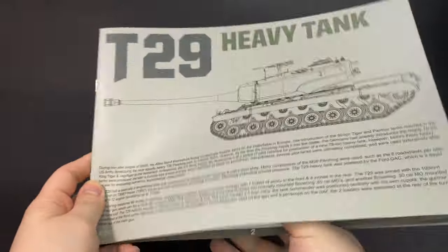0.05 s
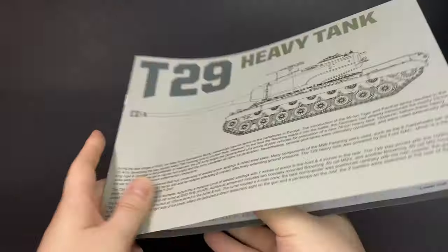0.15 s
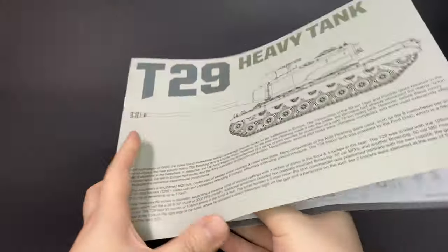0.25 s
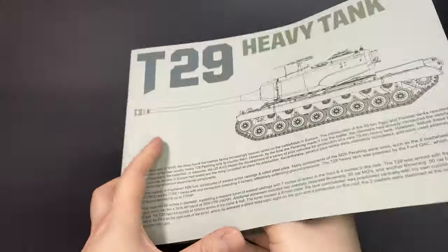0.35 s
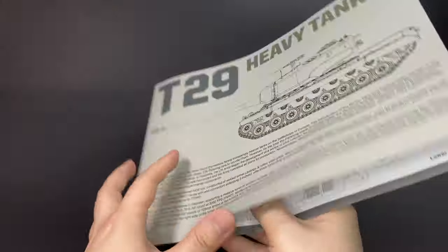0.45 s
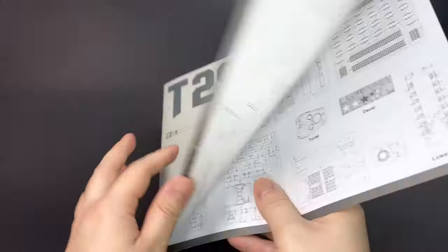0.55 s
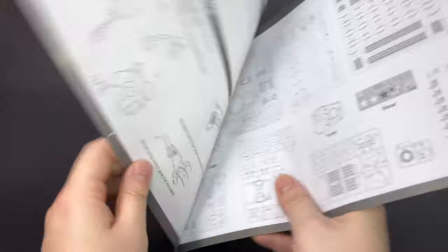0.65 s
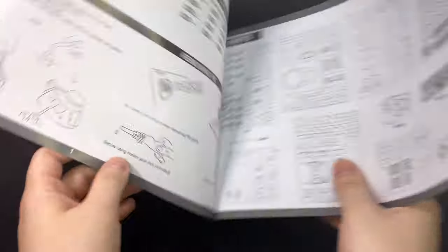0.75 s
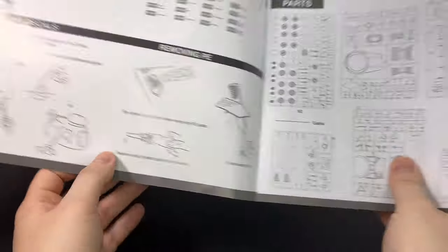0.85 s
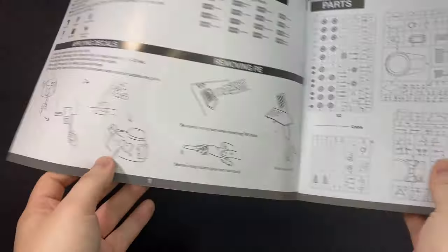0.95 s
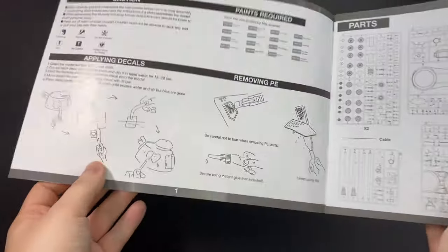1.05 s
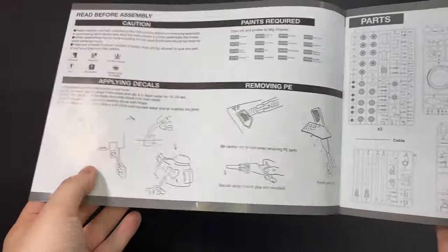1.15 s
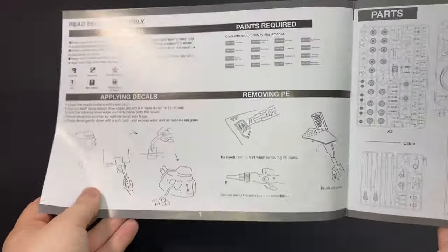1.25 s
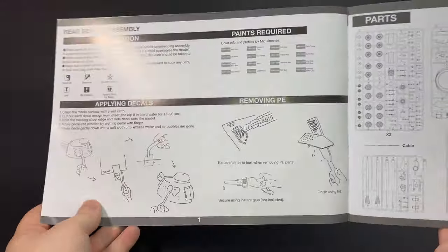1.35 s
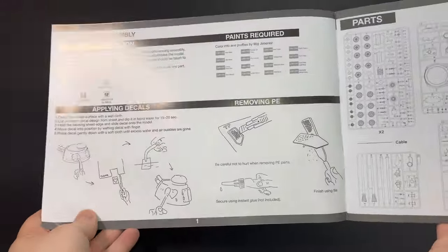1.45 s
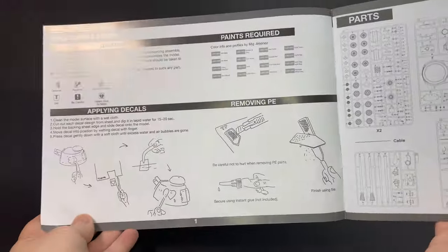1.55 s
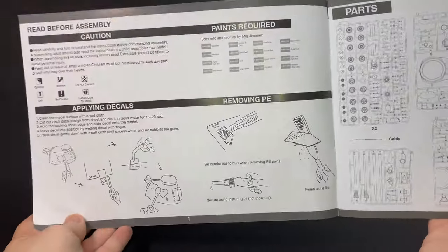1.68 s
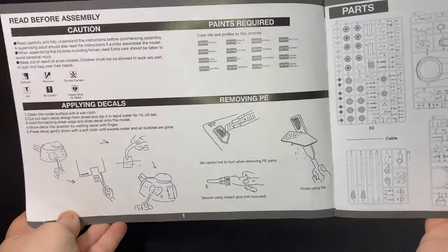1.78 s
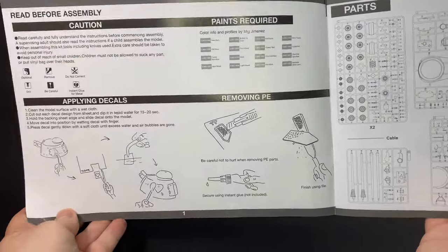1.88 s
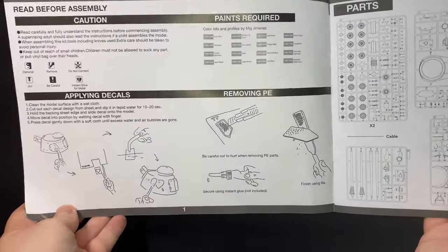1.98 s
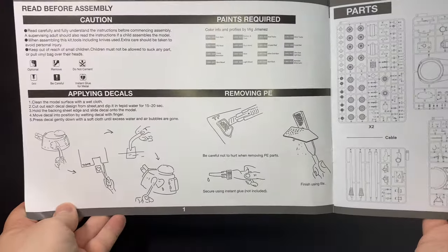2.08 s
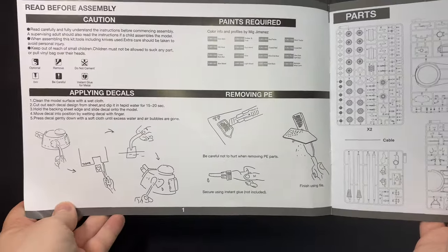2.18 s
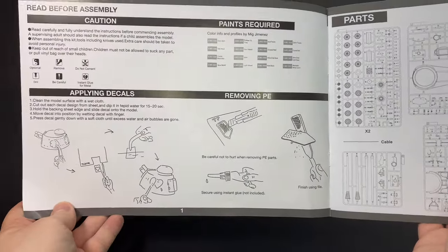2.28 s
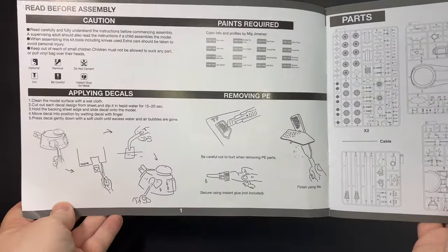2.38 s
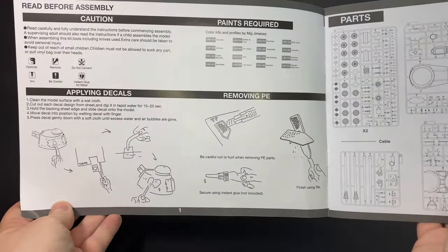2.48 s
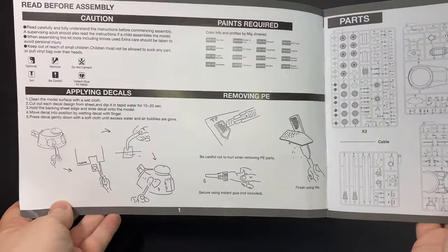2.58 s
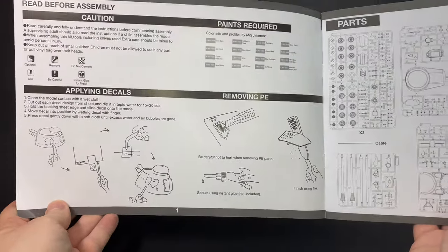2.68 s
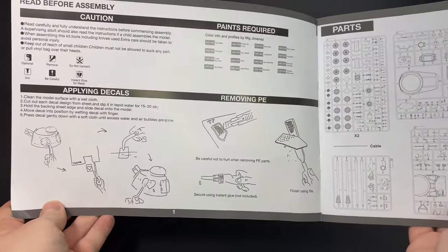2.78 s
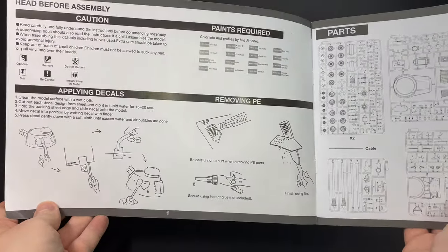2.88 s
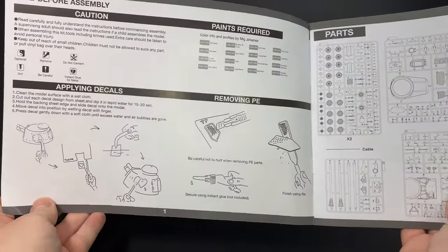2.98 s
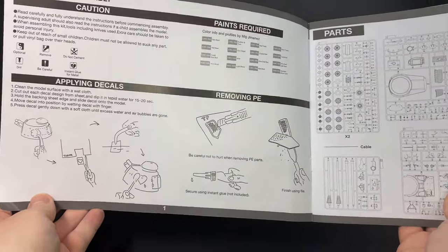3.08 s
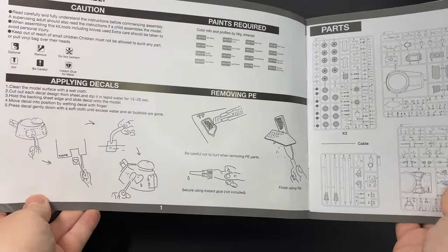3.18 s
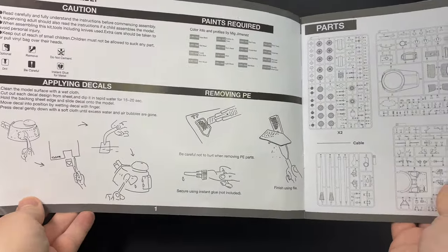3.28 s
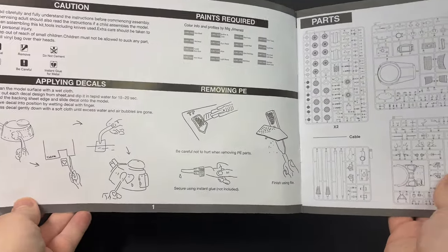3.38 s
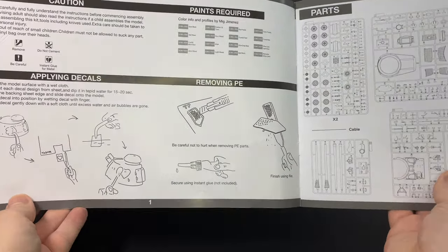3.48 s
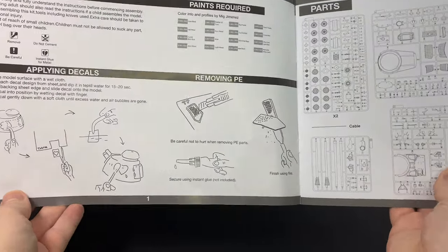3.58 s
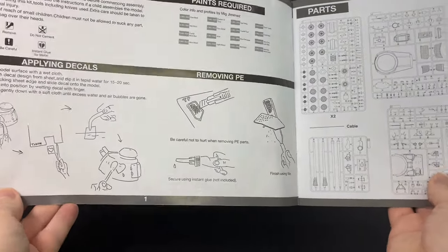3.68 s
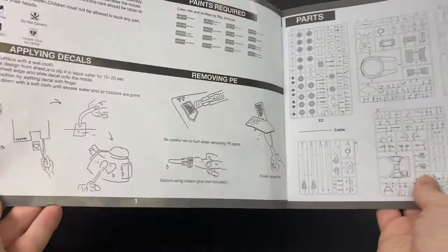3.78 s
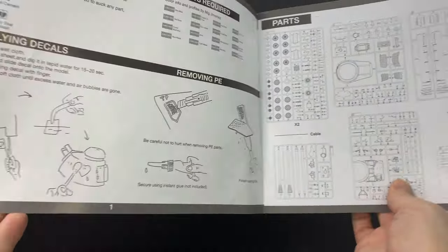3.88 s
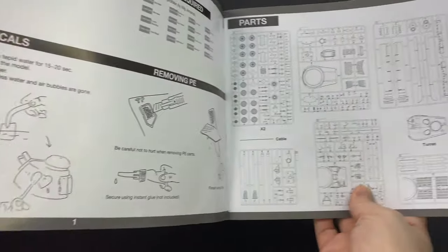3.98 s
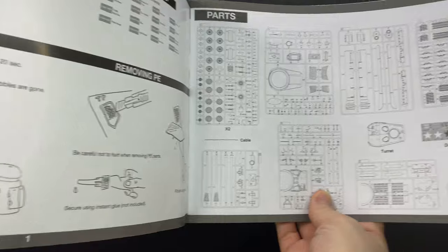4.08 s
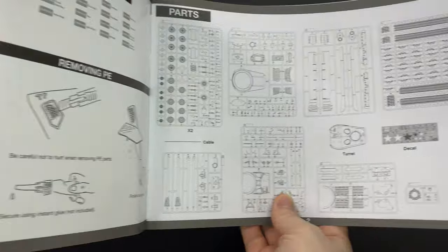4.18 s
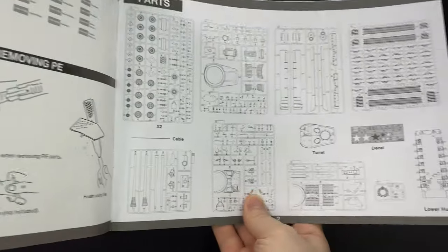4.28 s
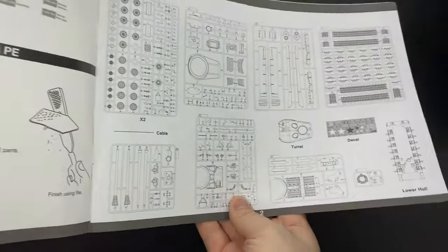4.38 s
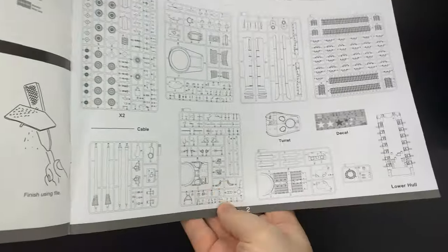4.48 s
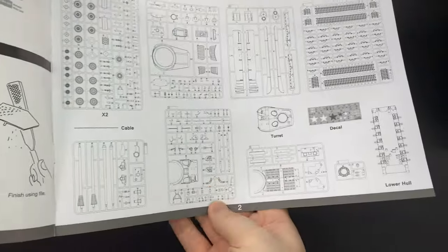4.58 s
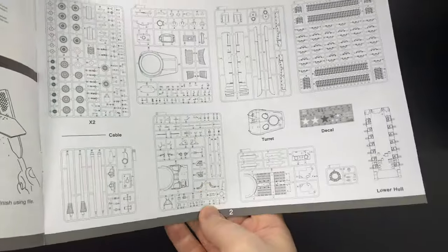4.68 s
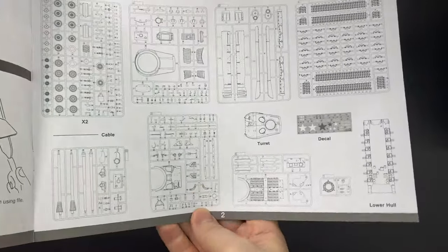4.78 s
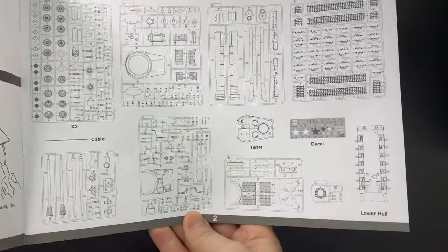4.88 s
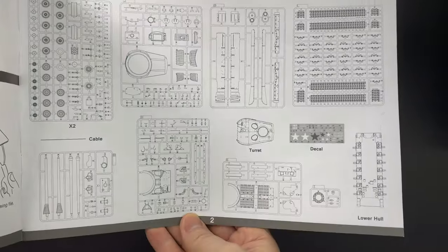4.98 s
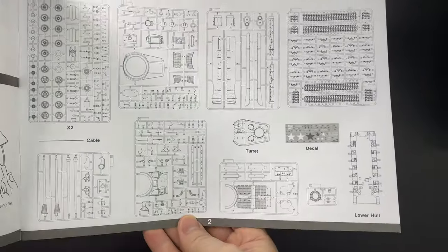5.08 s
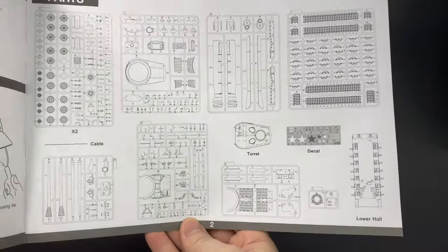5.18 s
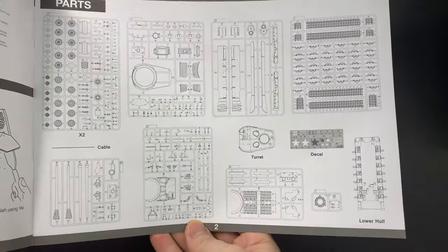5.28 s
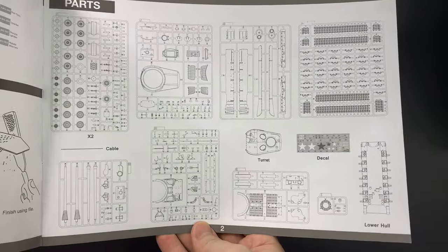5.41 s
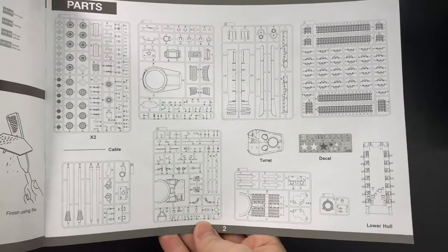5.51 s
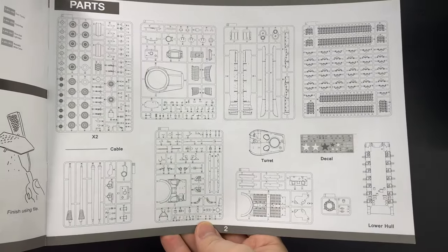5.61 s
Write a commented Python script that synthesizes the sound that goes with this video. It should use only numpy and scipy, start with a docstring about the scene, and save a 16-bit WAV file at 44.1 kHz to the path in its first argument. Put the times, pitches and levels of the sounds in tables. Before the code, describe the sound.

Busy rustle, flap and crackle of thick pages for two seconds, then near quiet and two softer rustles above a faint indoor hum.

```python
"""A stiff paper booklet is opened and handled close to the microphone in a small, quiet room.
Low hum, rumble and a faint drone last throughout. From the start, sheets slide (dense hissing slips) and are
rubbed (short slip runs); then pages wobble (dispersed bucklings) and flap (ringing bands of modes), and page
edges flick off the thumb (falling bending-wave chirps), most thickly from 1.2 to 1.9 s.
After a lull, fainter handling returns near 2.8 s, as the drone stands out and then mostly climbs in pitch."""
import sys
import numpy as np
from scipy import signal
from scipy.fft import rfft, irfft, next_fast_len
from scipy.io import wavfile

SR = 44100
rng = np.random.default_rng(int(sys.argv[2]) if len(sys.argv) > 2 else 0)


def persist_wave(psi):
    """Save psi, clipped to +-1, as 16-bit WAV."""
    counts = np.round(np.clip(psi, -1, 1) * 32767).astype(np.int16)
    wavfile.write(sys.argv[1], SR, np.atleast_2d(counts).T)


N = 249165
TIME = np.arange(N) / SR
SHORT = 8192  # length of a brief sound [samples]
SHORT_TIME = np.arange(SHORT) / SR
SHORT_HZ = np.maximum(np.fft.rfftfreq(SHORT, 1 / SR), 1)


def undb(db):
    """Amplitude ratio of a level in decibels: twenty decibels make a factor of ten."""
    return 10 ** (np.asarray(db) / 20)


def unit(x):
    """Normalise the root-mean-square amplitude to 1."""
    return x / np.sqrt(np.mean(x ** 2))


def gains(points, hz):
    """Read a spectrum as straight lines of level against log frequency, flat beyond its ends."""
    f, db = np.transpose(points)
    return undb(np.interp(np.log(np.maximum(hz, 1e-6)), np.log(f), db))


def hump(hz, centre_hz, octaves):
    """A Gaussian band on the log-frequency axis, whose standard deviation is given in octaves."""
    distance = np.log2(np.maximum(hz, 1) / centre_hz)
    return np.exp(-.5 * (distance / octaves) ** 2)


def shape(x, response):
    """Linear filtering: multiply the spectrum by a function of frequency."""
    size = next_fast_len(x.shape[-1] + 2048)
    spectrum = rfft(x, size) * response(np.fft.rfftfreq(size, 1 / SR))
    return irfft(spectrum, size)[..., :x.shape[-1]]


def stereo_field(pair, apart_hz):
    """Interchannel coherence: left and right are alike in the bass, unrelated above apart_hz."""
    side = shape(pair[1], lambda f: np.clip(f / apart_hz, .17, 1))
    return np.array([pair[0] + side, pair[0] - side])


def walk(rate):
    """Random modulation: Gaussian values, rate per second, joined by lines; its spread is near 1."""
    steps = rng.standard_normal(4096)
    return np.interp(TIME * rate, np.arange(len(steps)), steps)


def curve(table):
    """Piecewise-linear control: the value columns of a table, read against its time column."""
    s, *columns = np.transpose(table)
    return [np.interp(TIME, s, column) for column in columns]


def add(out, s, sound):
    """Superposition: mix a sound in at time s."""
    start = max(int(s * SR), 0)
    out[:, start:start + sound.shape[1]] += sound[:, :N - start]


def slips(rate, spread_db):
    """Stick-slip friction: tiny slips of fibre on fibre, at random times and of uneven size."""
    times = np.flatnonzero(rng.random(N) < rate / SR)
    size = undb(spread_db * np.minimum(rng.exponential(size=N)[times], 3.5))
    train = np.zeros(N)
    train[times] = size * rng.uniform(-1, 1, N)[times]
    return unit(train)


def stroke(s, length, swell_db, attack_s, release_s):
    """Envelope of one hand movement: it gets going, swells or eases while it lasts, then dies away."""
    t = TIME - s
    attack = np.sin(np.pi / 2 * np.clip(t / attack_s, 0, 1)) ** 2
    hold = undb(swell_db * (np.clip(t / length, 0, 1) - .5))
    release = np.exp(-np.clip((t - length) / release_s, 0, 20))
    return attack * hold * release


def bending(hz, travel_s):
    """Dispersion: bending waves run as the root of frequency; 1 kHz takes travel_s, treble less."""
    return np.exp(-4j * np.pi * travel_s * np.sqrt(1000 * hz))


def background(hum_hz=66, rumble_db=-69, waver_db=1, swell_db=2, follow=0.13):
    """Steady low-frequency sources: a sine hum, a two-partial drone and spectrally shaped room noise."""
    # slow swell of the hum: (time [s], level before the waver [dB])
    hum_levels = [(0, -68), (2.2, -73), (3.1, -66), (4.0, -61.5), (5.65, -60.5)]
    # faint distant drone: (time [s], unsounded fundamental [Hz], level before the waver [dB])
    drone_path = [(0, 44, -78.5), (2.3, 48, -77.5), (2.85, 48, -63.5), (3.3, 54, -70), (3.9, 74, -81),
                  (4.6, 73, -72), (5.0, 77, -75.5), (5.65, 89, -80)]
    # relative spectrum of the rumble: (frequency [Hz], gain [dB])
    rumble_spectrum = [(20, -27), (40, -9), (55, -7), (75, -1.5), (100, 5), (135, -6.5), (220, -13.5),
                       (400, -24.5), (1000, -39.5), (3000, -43), (10000, -47), (15000, -49.5)]
    hum_db = curve(hum_levels)[0]
    hum = unit(np.sin(2 * np.pi * hum_hz * TIME)) * undb(hum_db + waver_db * walk(5.3))

    drone_hz, drone_db = curve(drone_path)
    phase = 2 * np.pi * np.cumsum(drone_hz * (1 + 0.015 * walk(12))) / SR
    partials = np.sin(2 * phase) + .2 * np.sin(3 * phase)  # second and third harmonics only
    drone = unit(partials) * undb(drone_db + 2 * walk(33))

    noise = stereo_field(rng.standard_normal((2, N)), 900)
    rumble = unit(shape(noise, lambda f: gains(rumble_spectrum, f)))
    # only the bass of the rumble comes and goes, and it grows with the hum
    bass = shape(rumble, lambda f: hump(f, 110, 1.3))
    swell = undb(swell_db * walk(9.1) + follow * (hum_db - hum_db.max()))
    return hum + drone + (rumble + bass * (swell - 1)) * undb(rumble_db)


def sliding(rate=7000, spread_db=2.0, flutter_db=2.02, patchy_db=2, lag_s=.000295,
            scatter=1.0, scatter_s=0.0074, attack_s=0.022, release_s=.013):
    """Friction noise: dense slips hiss from the right-hand pages, their colour shifting with the contact."""
    # strokes of sheet over sheet: (start [s], length [s], relative level at mid-stroke [dB],
    # swell from start to end [dB], gain of the topmost band [dB])
    slide_strokes = [(-0.018, 0.099, -58, 11.5, -1.5), (0.091, 0.13, -61.5, 3.5, 7.5),
                     (0.226, .18, -62.5, -3.5, -1.5), (0.409, 0.14, -58, -2, -5),
                     (0.528, 0.022, -43.5, 6.5, -4), (0.601, .11, -52, -7, 2),
                     (0.708, 0.086, -57.5, 15.5, -3.5), (0.807, 0.16, -53.5, -6, 5),
                     (0.919, 0.1, -54, -1, 4), (1.043, 0.097, -64.5, 12, 7), (1.096, 0.14, -53, -3, 3.5),
                     (1.223, 0.15, -59.5, 9, -2), (1.4, 0.027, -56, -13, 2), (1.621, 0.042, -61, -5, -1),
                     (2.826, 0.2, -92, 2.5, 4), (2.996, .14, -82.5, -11.5, 7.5), (3.015, 0.041, -69, -7, 4),
                     (3.365, 0.082, -70.5, 5.5, -8.5), (3.441, 0.037, -61, 3, -3),
                     (3.577, 0.1, -59.5, -1, -3), (3.78, 0.032, -77, 0.5, 0), (3.943, 0.034, -85, -2.5, -3),
                     (4.014, 0.11, -83, -4, -1), (4.114, 0.13, -73.5, 10.5, 5), (4.268, 0.033, -57, 1, 1),
                     (4.324, 0.14, -54, 5.5, -2.5), (4.5, 0.16, -87, 1, -2),
                     (4.655, 0.18, -80.5, -19, -3.5), (4.827, 0.041, -77.5, -2.5, -8.5)]
    # relative spectrum of the hiss: (frequency [Hz], gain [dB])
    hiss_spectrum = [(300, -5), (1000, -2.5), (2000, -1), (2900, -5.5), (4200, 4.5), (5200, 0),
                     (7400, -4.5), (8500, -5.5), (9800, 0), (13000, -0.5), (14400, -2), (15500, -10.5)]
    power, top_power = 0, 0
    for s, length, db, swell_db, top_db in slide_strokes:
        push = (undb(db) * stroke(s, length, swell_db, attack_s, release_s)) ** 2
        power = power + push
        top_power = top_power + push * undb(top_db) ** 2

    grains = slips(rate, spread_db)
    # the left channel hears them later, and the open pages scatter them differently to each channel
    late = shape(grains, lambda f: np.exp(-2j * np.pi * f * lag_s))
    direct = np.array([late, grains])
    pages = rng.standard_normal((2, SHORT)) * np.exp(-SHORT_TIME / scatter_s)
    scattered = unit(signal.fftconvolve(grains[None], pages, axes=1)[:, :N])
    hiss = unit(shape(direct + scatter * scattered, lambda f: gains(hiss_spectrum, f)))

    centres = np.geomspace(1200, 12000, 7)  # overlapping bands that sum to the whole hiss [Hz]
    out = 0
    for hz, share in zip(centres, np.eye(len(centres))):
        band = shape(hiss, lambda f: np.interp(f, centres, share))
        band_power = top_power if hz == centres[-1] else power
        out = out + band * undb(patchy_db * walk(30)) * np.sqrt(band_power)
    return np.sqrt(2) * out * undb(flutter_db * walk(70))


def scuffs(rate=1800, spread_db=4):
    """Brief friction: a band-limited run of slips swells and dies as a half sine."""
    # quick rubs of finger or page edge:
    # (start [s], length [s], level before the envelope [dB], centre [Hz], width [octaves])
    rubs = [(.008, 0.078, -51.5, 1980, 0.49), (0.416, .046, -50.5, 2020, 0.92),
            (0.495, 0.097, -45.5, 1250, 0.63), (0.539, .033, -38.5, 1550, .6),
            (.545, 0.034, -42, 4120, 0.42), (3.025, .022, -55, 1056, 0.33),
            (3.615, 0.096, -59.5, 2000, 1.1), (3.62, 0.1, -62, 630, 0.25), (4.175, 0.075, -73, 1290, 0.22),
            (4.191, 0.056, -64, 600, 0.28), (4.41, 0.099, -57, 2200, 1.06), (4.728, 0.18, -76.5, 2660, .16)]
    out = np.zeros((2, N))
    grains = stereo_field(np.array([slips(rate, spread_db), slips(rate, spread_db)]), 1500)
    for s, length, db, hz, octaves in rubs:
        start, size = int(s * SR), int(length * SR)
        rub = shape(grains[:, start:start + size], lambda f: hump(f, hz, octaves))
        add(out, s, unit(rub) * undb(db) * np.sin(np.linspace(0, np.pi, size)))
    return out


def wobbling(rate=1500, spread_db=2.0, travel_s=0.0037, attack_s=0.0067, release_s=0.021):
    """Dispersed buckling: small bucklings smear in the swinging sheet into a hollow flutter."""
    # swings of a lifted page: (start [s], length [s], level at mid-swing [dB], swell from start to end [dB])
    swing_strokes = [(0.047, 0.027, -48, -1), (0.189, 0.14, -56, -1.5), (0.345, 0.21, -57, -17),
                     (0.504, 0.13, -55.5, -1.5), (0.762, 0.13, -45.5, 1), (0.935, 0.085, -58.5, 1),
                     (1.026, 0.18, -50, 7), (1.224, 0.056, -43.5, -2), (1.355, 0.12, -48.5, 3),
                     (1.568, 0.14, -64, -9), (3.047, 0.19, -75, -12), (3.381, 0.11, -61, -1.5),
                     (3.6, 0.078, -66, 4), (4.185, 0.31, -73, 8), (4.554, 0.071, -67, -9),
                     (4.679, 0.067, -68, -16)]
    # relative spectrum of the sheet: (frequency [Hz], gain [dB])
    sheet_spectrum = [(50, -38), (80, -17), (115, 2.5), (260, 3.5), (370, -1.5), (570, -0.5), (850, -10),
                      (1400, -27.5), (3000, -28.5), (8000, -60.5)]
    bucklings = np.array([slips(rate, spread_db), slips(rate, spread_db)])
    sheet = shape(bucklings, lambda f: gains(sheet_spectrum, f) * bending(f, travel_s))
    motion = 0
    for s, length, db, swell_db in swing_strokes:
        motion = motion + undb(db) * stroke(s, length, swell_db, attack_s, release_s)
    return unit(stereo_field(sheet, 1500)) * motion


def flaps(rise_cycles=0.74, base_t60_s=.08, pitch_power=0.71, doubling_db=26.5):
    """Modal ringing: a sheet gives way and its crowded modes ring; tighter bends ring higher and quicker."""
    # a bent sheet giving way: (time [s], level before the fade [dB], centre [Hz], width [octaves])
    collapses = [(.052, -43, 346, 0.48), (.121, -37.5, 770, 0.18), (.122, -47, 124, 0.32),
                 (.176, -41.5, 990, 0.74), (.229, -42.5, 640, 1.16), (.33, -31.5, 756.7, 0.74),
                 (.402, -38, 368, 0.099), (.555, -25.5, 640, 0.94), (.56, -33.5, 258.7, 0.43),
                 (.695, -43, 476, 0.7), (0.77, -38.5, 540, 0.63), (.818, -32, 497, 0.64),
                 (.82, -32.5, 153, 0.41), (.874, -34.5, 503, 0.68), (.884, -30, 227, 1),
                 (1.127, -37, 455, 0.52), (1.164, -36.5, 680, 0.34), (1.218, -26.5, 420, 0.59),
                 (1.243, -28, 350, 0.37), (1.371, -43.5, 567, .45), (1.503, -36.5, 200, .65),
                 (1.608, -39.5, 190.3, 0.66), (1.861, -37.5, 330, 1), (1.865, -43, 175, 0.18),
                 (2.755, -63, 349, 0.24), (2.988, -56.5, 340, 0.33), (3.031, -39.5, 300.6, 0.64),
                 (3.056, -55.5, 450, .6), (3.137, -52.5, 352, 0.38), (3.212, -59, 295, 0.31),
                 (3.278, -62.5, 404, 0.39), (3.708, -57, 280, 0.54), (3.776, -60.5, 380, 0.54),
                 (3.803, -48.5, 229, 0.19), (3.955, -69.5, 554, 0.56), (4.053, -56, 227, 0.24),
                 (4.333, -47, 257, 0.83), (5.384, -70, 294, .43)]
    out = np.zeros((2, N))
    for s, db, hz, octaves in collapses:
        # base_t60_s holds at 400 Hz and -42 dB; lower ones ring longer, and a gentle sag outlasts a hard snap
        t60 = base_t60_s * (400 / hz) ** pitch_power * 2 ** ((-42 - db) / doubling_db)
        noise = stereo_field(rng.standard_normal((2, SHORT)), 1900)
        modes = shape(noise, lambda f: hump(f, hz, octaves))
        rise = 1 - np.exp(-SHORT_TIME * hz / rise_cycles)
        fade = rise * np.exp(-np.log(1000) * SHORT_TIME / t60)
        add(out, s, unit(modes * fade) * np.sqrt(np.mean(fade ** 2)) * undb(db))
    return out


def flicks(tick_db=-23, body_db=-14, top_db=-19, body_octaves=0.6, travel_s=.0031, edge_echo=0.51,
           lead=0.18, far_spot=1.2, fizz_db=-3, fizz_s=.012):
    """Dispersion: each flick is a falling chirp, returned by the sheet's edges, with a scraping fizz."""
    # page edges flicking free: (time [s], tick level before tick_db [dB], body level before body_db [dB],
    # pan of the tick, left minus right, halved for the body [dB])
    releases = [(.078, -44, -54, 10), (.1211, -41, -54.5, 2), (0.403, -47.5, -56, 15),
                (.5555, -38.5, -28.5, 10.5), (1.243, -42.5, -42.5, 18), (1.259, -39, -37, -7),
                (1.2837, -40, -40.5, 12), (1.3183, -39.5, -45, 5.5), (1.3826, -36.5, -41, 7),
                (1.4099, -36.5, -43.5, 6), (1.4807, -36, -43.5, 5), (1.5053, -39, -40, 9.5),
                (1.5469, -31, -39.5, 2.5), (1.583, -34, -38.5, 6), (1.6112, -32, -37.5, 5.5),
                (1.718, -30.5, -38.5, 6.5), (1.832, -27.5, -40, 6.5), (1.8602, -29.5, -40.5, 5),
                (3.029, -56, -49.5, 6.5), (3.3608, -40, -42, 3.5), (3.4007, -42, -45.5, 9.5),
                (3.4312, -42.5, -43, 4), (3.5443, -46.5, -49.5, 5.5), (3.5888, -46.5, -46.5, 9.5),
                (4.5509, -52.5, -64.5, 15), (4.572, -47, -58, 6), (4.5918, -49, -56.5, 4.5),
                (4.6663, -53.5, -69, 5), (4.6852, -46.5, -61, 5), (4.9844, -70.5, -72.5, 8.5)]
    # where the thumb holds the pages colours a run of flicks: (from [s], body centre [Hz],
    # tick centre [Hz], top relative to the tick, before top_db and without tick_db [dB])
    grips = [(0, 606, 3270, -12), (.5, 497.4, 4200, 1.5), (1.2, 460, 3580, -11.5), (1.36, 620, 3580, -12.5),
             (1.7, 560, 3250, -13), (2.9, 390, 4270, -3.5), (4.5, 570, 3300, -21), (4.65, 307, 3310, -30.5)]
    # relative spectrum of the tick: (multiple of its centre frequency [ratio], gain [dB])
    tick_spectrum = [(.15, -28.5), (.42, 2), (.7, -1), (1, 7), (1.45, -2.5), (2, -6), (2.6, -20)]
    # relative spectrum of the top: (frequency [Hz], gain [dB])
    top_spectrum = [(4000, -31), (7200, -6.5), (8600, -6.5), (10000, 0), (14300, -7.5), (15500, -9.5)]

    def band(spectrum, db):
        """Parseval's level: a spectrum becomes a sound of the given rms level."""
        return unit(irfft(spectrum)) * undb(db)

    out = np.zeros((2, N))
    direct = bending(SHORT_HZ, travel_s)
    for s, tick, body, pan_db in releases:
        _, body_hz, tick_hz, top = [grip for grip in grips if grip[0] <= s][-1]
        # four edge reflections, each by a path some multiple of the direct one
        detours, signs = rng.uniform(1.4, 4.5, (4, 1)), rng.choice([-1, 1], (4, 1))
        returns = signs * bending(SHORT_HZ, travel_s * detours) / np.sqrt(detours)
        chirp = direct + edge_echo * np.sum(returns, axis=0)
        # the channels hear the short waves from different spots of the sheet, the long waves alike
        spots = np.array([chirp, chirp * bending(SHORT_HZ, travel_s * (far_spot - 1))])
        fizz = rng.standard_normal((2, SHORT)) * np.exp(-SHORT_TIME / fizz_s)
        crack = rfft(unit(irfft(spots)) + undb(fizz_db) * unit(fizz))

        lean = undb(np.array([[pan_db], [-pan_db]]) / 2)
        sound = lean * band(crack * gains(tick_spectrum, SHORT_HZ / tick_hz), tick + tick_db)
        sound += np.sqrt(lean) * band(chirp * hump(SHORT_HZ, body_hz, body_octaves), body + body_db)
        sound += band(crack * gains(top_spectrum, SHORT_HZ), tick + top + top_db)
        add(out, s - lead * travel_s, sound[:, :SHORT // 2])
    return out


def room(x, bounce_s=0.0038, bounce=0.1, gap_s=0.0092, treble_db=-1, bass_db=-9, bass_hz=170,
         t60_s=0.19, bass_t60_s=0.68, tail_db=-10.5):
    """Reflection and reverberation: one close table echo, then a dense wall tail with lingering bass."""
    t = np.arange(SR // 2) / SR
    near = shape(x, lambda f: 1 + bounce * np.exp(-2j * np.pi * f * bounce_s))

    def decay(t60):
        """Exponential decay: noise starts after the gap and falls 60 dB in t60 seconds."""
        noise = stereo_field(rng.standard_normal((2, len(t))), 670)
        return unit(noise * (t > gap_s) * np.exp(-np.log(1000) * t / t60)) / np.sqrt(len(t))

    # (frequency [Hz], gain [dB])
    tail_spectrum = [(100, 1), (400, 0.35), (3000, 0.15), (10000, treble_db)]
    tail = shape(decay(t60_s), lambda f: gains(tail_spectrum, f))
    tail += undb(bass_db) * shape(decay(bass_t60_s), lambda f: hump(f, bass_hz, 1.0))
    return near + undb(tail_db) * signal.fftconvolve(x, tail, axes=1)[:, :N]


def scene():
    """Superposition: all the paper sounds pass through the room and join the background."""
    paper = sliding() + scuffs() + wobbling() + flaps() + flicks()
    return room(paper) + background()


def record(dry, notch_hz=12050, notch_octaves=0.1, notch_depth=0.94, top_hz=15300):
    """Band limiting: the microphone has a narrow dip in the treble, and a steep low-pass cuts the top."""
    coloured = shape(dry, lambda f: 1 - notch_depth * hump(f, notch_hz, notch_octaves))
    low_pass = signal.ellip(8, .2, 70, top_hz, fs=SR, output="sos")
    return signal.sosfilt(low_pass, coloured)


dry = scene()
out = record(dry)
persist_wave(out)
```